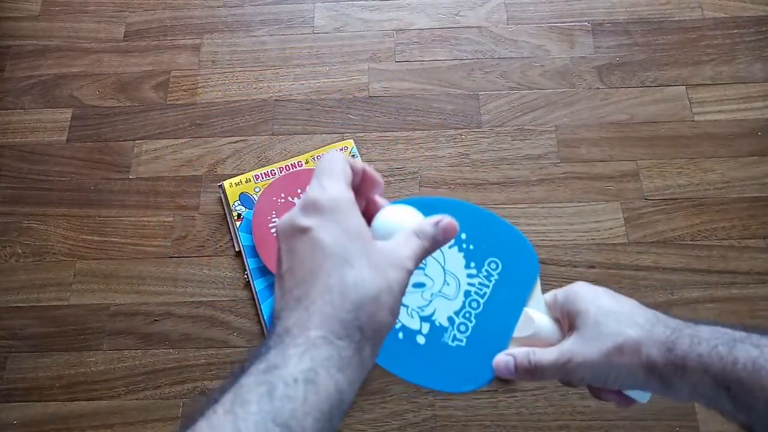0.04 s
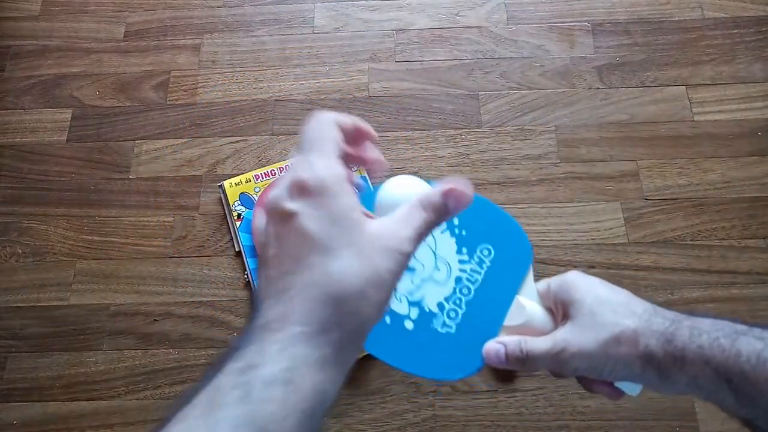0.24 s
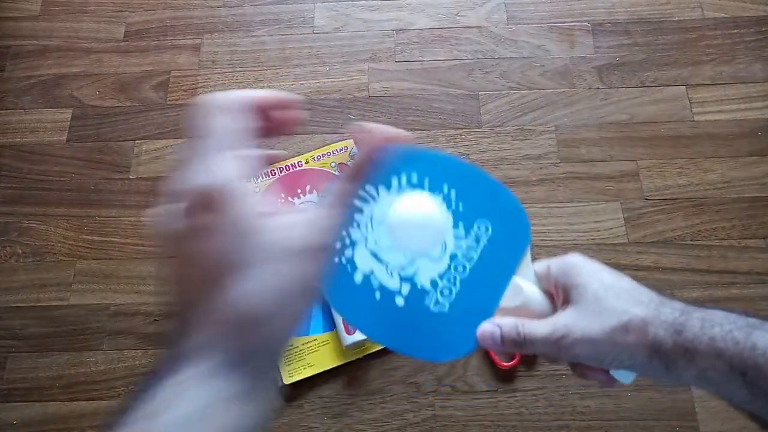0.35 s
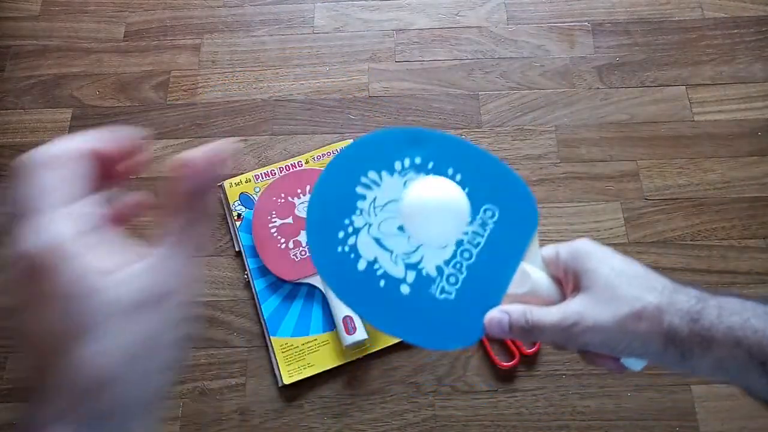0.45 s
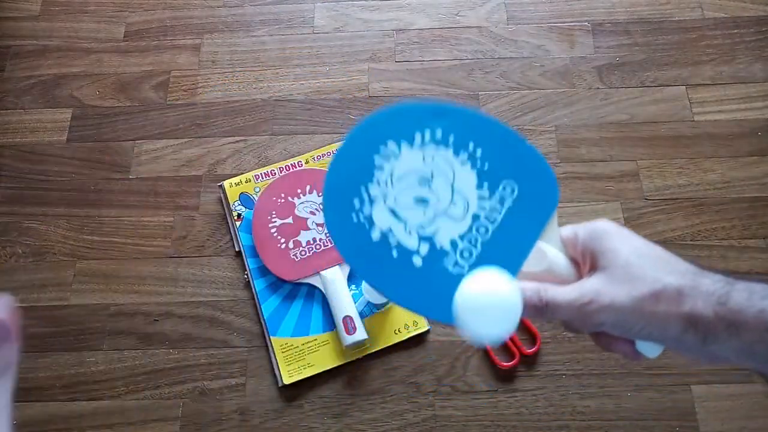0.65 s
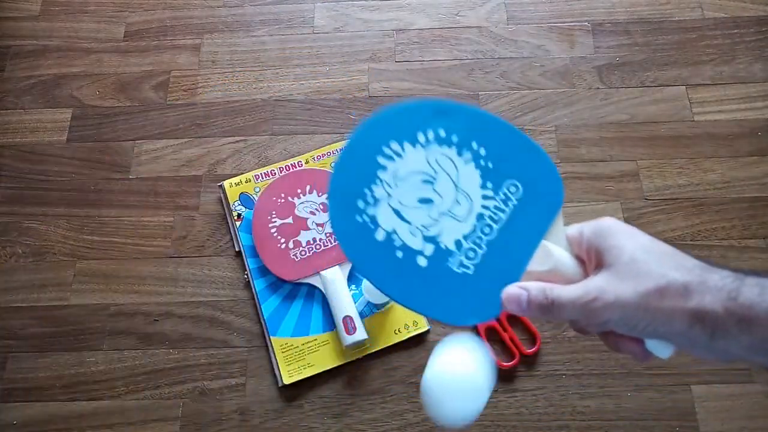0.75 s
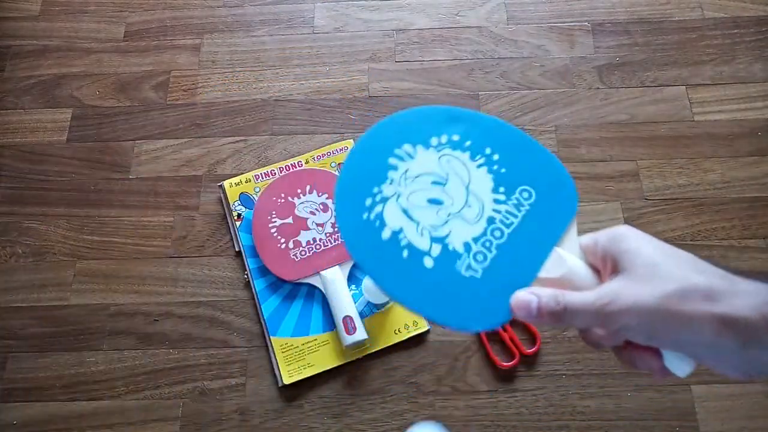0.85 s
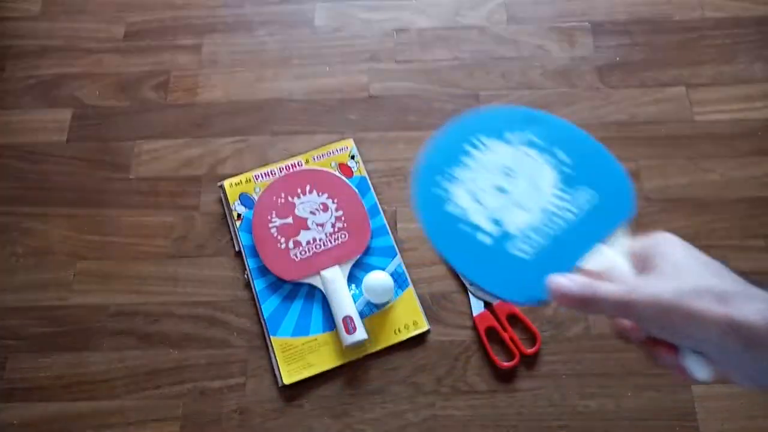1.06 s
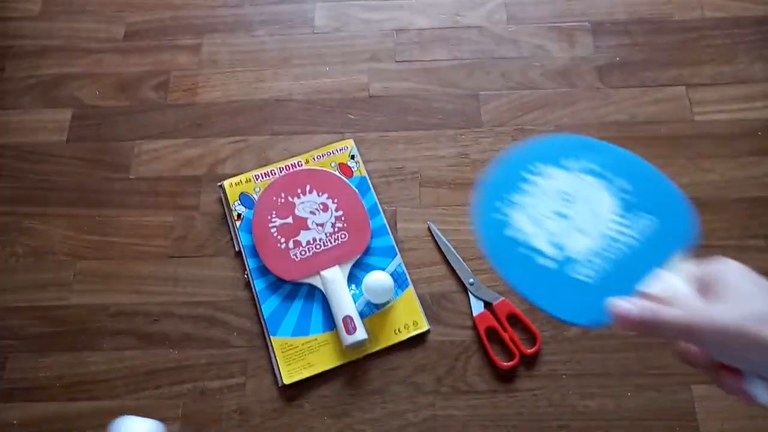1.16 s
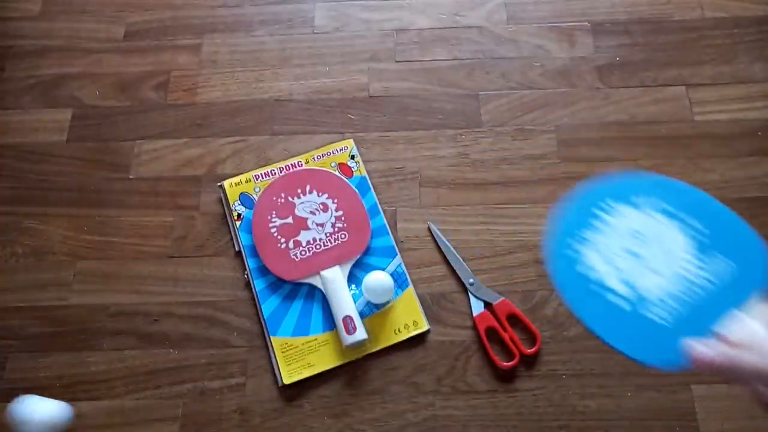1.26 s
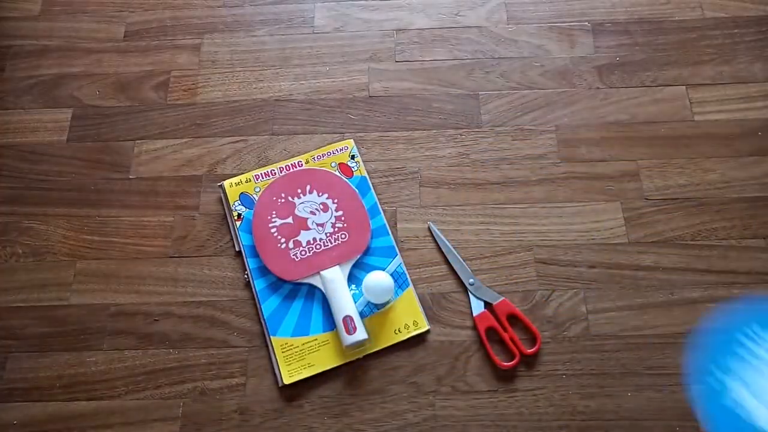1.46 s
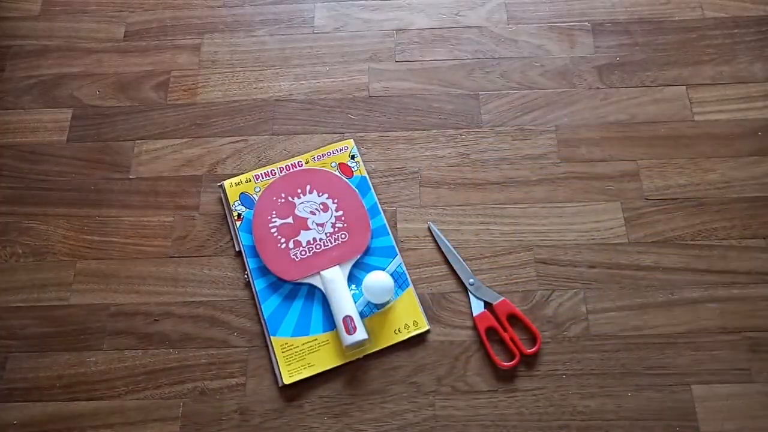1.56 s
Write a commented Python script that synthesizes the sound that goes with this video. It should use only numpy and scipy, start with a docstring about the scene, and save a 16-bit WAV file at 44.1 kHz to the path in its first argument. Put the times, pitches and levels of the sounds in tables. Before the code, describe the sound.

Ping pong ball clicking twice on a paddle, then bouncing away over wood indoors.

```python
"""Ping pong ball on paddle and floor

A ball is tapped twice on a wooden paddle close by, grazes its edge, then bounces away over a wooden
floor in a small, live room. Each hit rings both the wood and the ball's thin plastic shell.
The player's movements make a few dull thumps, and a faint whining hum runs underneath.
The loudest tap overloads the microphone, and noise suppression shortens the room's echo."""
import sys
import numpy as np
from scipy import signal
from scipy.fft import rfft, irfft
from scipy.io import wavfile
from scipy.ndimage import uniform_filter1d

SR = 44100
rng = np.random.default_rng(int(sys.argv[2]) if len(sys.argv) > 2 else 0)


def store_wav(level_fs):
    """Save 16-bit WAV to argv[1]."""
    pcm = np.round(np.clip(np.atleast_2d(level_fs), -1, 1) * 32767)
    wavfile.write(sys.argv[1], SR, pcm.T.astype(np.int16))


N = 70560

# the notes of the ball's shell: (pitch [Hz], level [dB], time to fade by 60 dB [s])
SHELL_NOTES = [(6320, -28, .014), (8156, -1, .013), (8430, -5, .013), (9830, -1, .012), (10480, -5, .011),
               (11350, -6, 0.018), (11900, -9, .011), (12900, -13, .011), (13800, -20, .01)]
WOOD_RISE_S, SHELL_RISE_S = 0.0005, 0.00079


def amp(db):
    """Turns decibels into a factor to multiply a sound by."""
    return 10 ** (np.asarray(db) / 20)


def unit(x):
    """Scales a signal to an average power of one."""
    return x / np.sqrt(np.mean(abs(x) ** 2) + 1e-20)


def read(points, hz):
    """Reads between the rows of a (frequency, value) table, with octaves evenly spaced."""
    row_hz, value = np.transpose(points)
    return np.interp(np.log(hz + 1), np.log(row_hz + 1), value)


def add(mix, start_s, sound):
    """Adds a sound to the mix at the given time."""
    part = mix[round(start_s * SR):][:len(sound)]
    part += sound[:len(part)]


def coloured(x, points):
    """Shapes the tone of a sound by a table of (frequency [Hz], level [dB])."""
    hz = np.fft.rfftfreq(len(x), 1 / SR)
    return irfft(rfft(x) * amp(read(points, hz)), len(x))


def drift(rate_hz):
    """A smooth random wobble, mostly slower than the given rate."""
    hz = np.fft.rfftfreq(N, 1 / SR)
    spectrum = rfft(rng.standard_normal(N))
    return unit(irfft(spectrum / np.sqrt(1 + (hz / rate_hz) ** 4), N))


def ring(notes, rise_s):
    """A struck object's notes start with a slightly softened edge, then fade."""
    t = np.arange(SR // 4) / SR
    body = sum((-1) ** k * amp(db - 60 * t / fade_s) * np.sin(2 * np.pi * hz * t)
               for k, (hz, db, fade_s) in enumerate(notes))  # every second wave is flipped
    return body * (1 - np.exp(-(t / rise_s) ** 2))


def in_room(sound, room_db):
    """The direct sound, the first echoes off the walls and a fading wash, new for each call."""
    # how long the room rings: (frequency [Hz], time to fade by 60 dB [s])
    fade_times = [(100, 0.49), (250, 0.44), (450, 0.42), (850, .41), (1700, 0.43), (3300, 0.31),
                  (8000, .33), (11000, 0.3), (15000, .29)]
    # the room's tone: (frequency [Hz], level [dB])
    room_tone = [(60, -11), (130, -10), (230, 0), (450, 5.5), (650, 1), (1000, 4), (1500, 2), (1900, 0),
                 (2700, 0.5), (3400, -3.5), (5500, -0.5), (8300, -5), (10500, -2.5), (15000, -3)]
    # first echoes: (delay [s], level [dB])
    echoes = [(.0064, -22), (.0125, -9), (.0152, -14.5)]
    build_s = 0.0046
    t = np.arange(SR) / SR
    hz, when, noise = signal.stft(rng.standard_normal(SR), SR, nperseg=256)
    decay = amp(-60 * when / read(fade_times, hz)[:, None])
    tail = signal.istft(noise * decay, SR, nperseg=256)[1][:SR]
    tail *= 1 - np.exp(-(t / build_s) ** 2)
    tail /= np.linalg.norm(tail)
    for delay_s, db in echoes:
        add(tail, delay_s, amp([db]))
    response = amp(room_db) * coloured(tail, room_tone)
    response[0] += 1  # the direct sound
    return signal.fftconvolve(sound, response)


def hum():
    """A thin whine that wavers in pitch and flutters a little, over a quiet hiss of air."""
    # the whine's tones, at 1, 2, 3... times its pitch: (level [dB])
    tone_levels = [-53.5, -53.5, -51, -58.5, -60, -70.5, -64.5, -65, -65, -69, -67.5, -82.5]
    # the tone of the air: (frequency [Hz], relative level [dB])
    air_tone = [(30, -15.5), (150, -8.5), (350, -10.5), (600, -9), (1200, -4), (2500, -8.5), (4500, -15.5),
                (9000, -23.5), (16000, -34)]
    pitch_hz, wobble_hz, jitter_radians, flutter = 746, 31, 0.88, 0.11
    t, whine = np.arange(N) / SR, np.zeros(N)
    for k, db in enumerate(tone_levels, 1):
        phase = 2 * np.pi * (k * pitch_hz * t + rng.random()) + jitter_radians * drift(wobble_hz)
        strength = amp(db) * np.sqrt(2) * (1 + flutter * drift(wobble_hz))
        whine += strength * np.sin(phase)
    air = unit(coloured(rng.standard_normal(N), air_tone))
    return whine + amp(-59.5) * air


def thumps():
    """The player moves: soft pushes with no ring and without their deepest bass."""
    # dull thumps: (time [s], level [dB], softness [s])
    pushes = [(1.2442, -10.5, 0.00062), (1.341, -3.5, 0.00032), (1.4341, -17.5, 0.0008),
              (1.5315, -25, 0.00045)]
    bass_cut = signal.butter(3, 67.6, "highpass", fs=SR, output="sos")
    out, t = np.zeros(N), np.arange(SR // 8) / SR
    for start_s, db, soft_s in pushes:
        push = (t / soft_s) ** 5 * np.exp(-t / soft_s)
        thump = signal.sosfilt(bass_cut, push / push.max())
        add(out, start_s, in_room(amp(db) * thump, room_db=-13.5))
    return out


def crack(db):
    """The many weak, crowded notes of the plastic shell blur into a short burst of bright noise."""
    # the tone of the crack: (frequency [Hz], relative level [dB])
    crack_tone = [(300, -25.5), (1500, -11), (2700, -23.5), (3400, -12), (4100, -22.5), (4600, -13.5),
                  (5500, -30), (6500, -15.5), (7300, -18.5), (8400, 6.5), (9100, -6.5), (10400, 3),
                  (12000, -8.5), (14000, -15), (15500, -28)]
    fade_s = 0.022
    t = np.arange(SR // 4) / SR
    envelope = amp(db - 60 * t / fade_s) * (1 - np.exp(-(t / WOOD_RISE_S) ** 2))
    return envelope * unit(coloured(rng.standard_normal(len(t)), crack_tone))


def bounces():
    """Each bounce knocks the wooden floor briefly and sets the ball's thin shell ringing."""
    # the ball lands: (time [s], knock [dB], hollow ring [dB], clack [dB], ping [dB], ping pitch [Hz],
    # shell [dB], shell pitch [ratio], crack [dB], room [dB])
    hits = [(0.8535, -7.5, -10, -7, -9.5, 3356, -9.5, 1.0, -18.5, -3.5),
            (0.9417, -16, -20, -12.5, -9, 3003, -17.5, 1.03, -16.5, -9.5),
            (1.1171, -30, -13, -13, -12, 3380, -20, 1.0, -30, -2),
            (1.2919, -40, -18.5, -27.5, -19, 3176, -23, .99, -37, -2.5),
            (1.4454, -40, -27.5, -21, -14, 3242, -25.5, 1.2, -28.5, -3),
            (1.5592, -46, -49, -50.5, -29, 3410, -47.5, 1.0, -50, 5)]
    # the floor's low, middle and high notes: (pitch [Hz], level [dB], time to fade by 60 dB [s])
    knock = [(332, -4, 0.013), (500, -8.5, 0.018), (850, 2.5, 0.011)]
    hollow = [(1086, 0.5, 0.013), (1329, -9, 0.022)]
    clack = [(1730, 2, 0.012), (1990, -10, 0.0072), (2590, -16.5, 0.019)]
    ping_fade_s = 0.014
    out = np.zeros(N)
    for start_s, *wood_levels, ping_db, ping_hz, shell_db, ratio, crack_db, room_db in hits:
        wood = sum(amp(db) * ring(notes, WOOD_RISE_S)
                   for db, notes in zip(wood_levels, [knock, hollow, clack]))
        ping = ring([(ping_hz, ping_db, ping_fade_s)], rise_s=0.0013)
        shell_notes = [(hz * ratio, db + shell_db, fade_s) for hz, db, fade_s in SHELL_NOTES]
        shell = ring(shell_notes, SHELL_RISE_S)
        add(out, start_s, in_room(wood + ping + shell + crack(crack_db), room_db))
    return out


def paddle():
    """A tap rings the paddle's face with one strong hollow note; grazing the rim sounds lower notes."""
    # taps: (time [s], main note [dB], other notes [dB], shell [dB], main pitch [Hz], room [dB])
    taps = [(0.2181, 5.5, -6, -27, 828, -13.5), (0.4189, -4, -7.5, -37, 834.3, -22.5)]
    # the ball grazes the rim: (time [s], rim [dB], shell [dB], room for rim [dB], room for shell [dB])
    grazes = [(0.5295, -32, -38, -16.5, 1)]
    # the face's other notes, and the rim's: (pitch [Hz], level [dB], time to fade by 60 dB [s])
    other_notes = [(439, -7, 0.019), (1040.5, -7, 0.032), (1880, -11, .025), (2094, -13, 0.017),
                   (2363, -16.5, 0.029), (3200, -29.5, 0.06)]
    rim_notes = [(247.2, 2, 0.068), (739, 2.5, 0.12), (1730, -7.5, 0.034)]
    main_fade_s = 0.14
    out, shell = np.zeros(N), ring(SHELL_NOTES, SHELL_RISE_S)
    for start_s, main_db, other_db, shell_db, hz, room_db in taps:
        main_note = ring([(hz, main_db, main_fade_s)], WOOD_RISE_S)
        add(out, start_s, in_room(main_note + amp(shell_db) * shell, room_db))
        add(out, start_s, in_room(amp(other_db) * ring(other_notes, WOOD_RISE_S), room_db=-10))
    for start_s, rim_db, shell_db, rim_room_db, shell_room_db in grazes:
        add(out, start_s, in_room(amp(rim_db) * ring(rim_notes, WOOD_RISE_S), rim_room_db))
        add(out, start_s, in_room(amp(shell_db) * (shell + crack(db=-9)), shell_room_db))
    return out


def scene():
    """All sources at one microphone; ball and paddle are too small to give off bass."""
    bass_cut = signal.butter(2, 226, "highpass", fs=SR, output="sos")
    ball = signal.sosfilt(bass_cut, paddle() + bounces())
    return (ball + thumps() + hum())[None]


def suppress_noise(x):
    """Turns each frequency down unless it stands well above its own steady background."""
    cut_db, threshold_db = 16.5, 8
    spectrum = signal.stft(x, nperseg=2048, noverlap=1536)[2]  # rows are frequencies, columns are times
    power = uniform_filter1d(abs(spectrum) ** 2, size=3, axis=0)
    background = np.percentile(uniform_filter1d(power, size=5, axis=1), 15, axis=1)[:, None]
    over_db = 10 * np.log10(abs(power) / (abs(background) + 1e-20) + 1e-9)
    quiet = (over_db < threshold_db).astype(float)
    gain = amp(-cut_db * uniform_filter1d(quiet, size=9, axis=0))
    return signal.istft(spectrum * gain, nperseg=2048, noverlap=1536)[1][:N]


def record(dry):
    """The loudest tap overloads the microphone; then noise is turned down and the top treble is cut."""
    ceiling, top_hz = 0.95, 16100
    clipped = dry[0] / (1 + (dry[0] / ceiling) ** 12) ** (1 / 12)
    treble_cut = signal.firwin(255, top_hz, window=("kaiser", 9), fs=SR)
    return signal.oaconvolve(suppress_noise(clipped), treble_cut, "same")[None]


dry = scene()
out = record(dry)
store_wav(out)
```